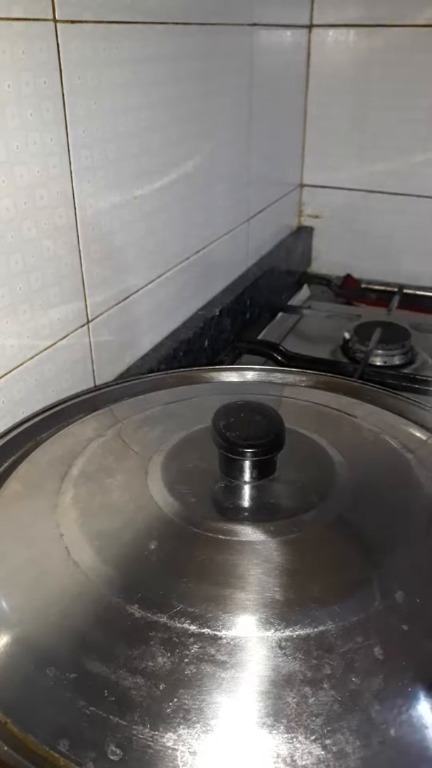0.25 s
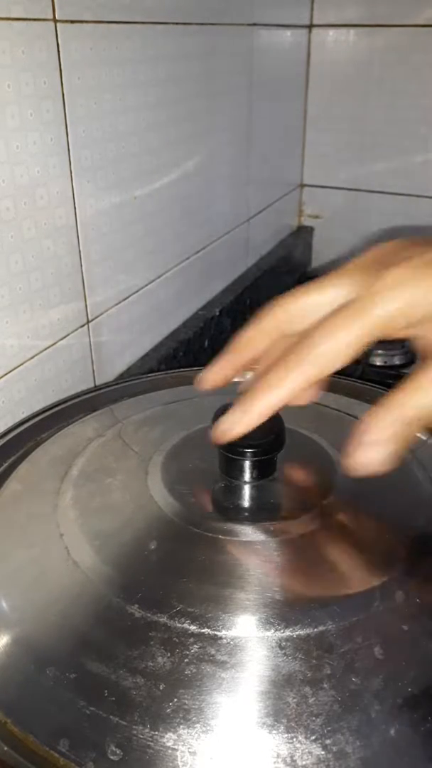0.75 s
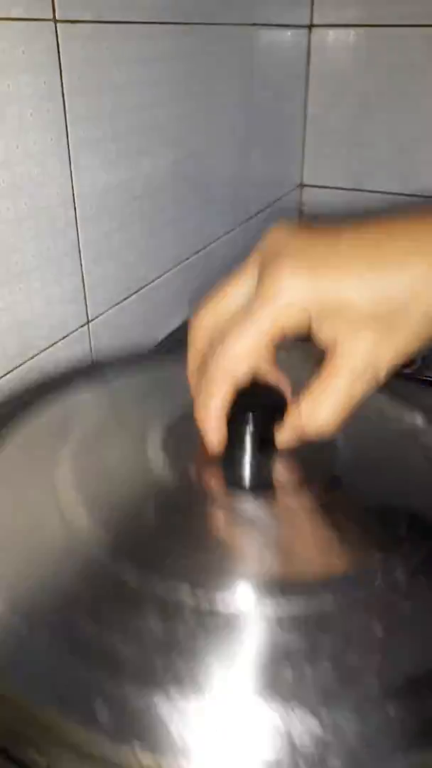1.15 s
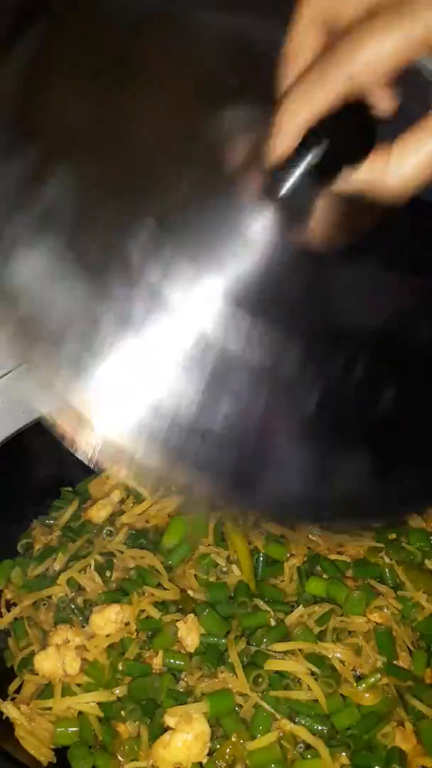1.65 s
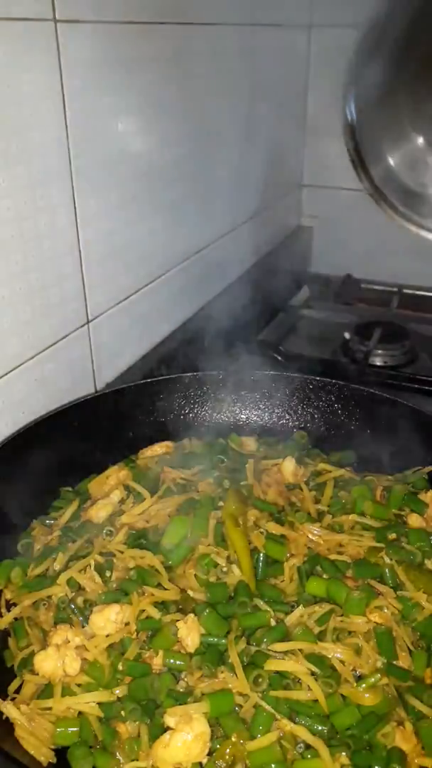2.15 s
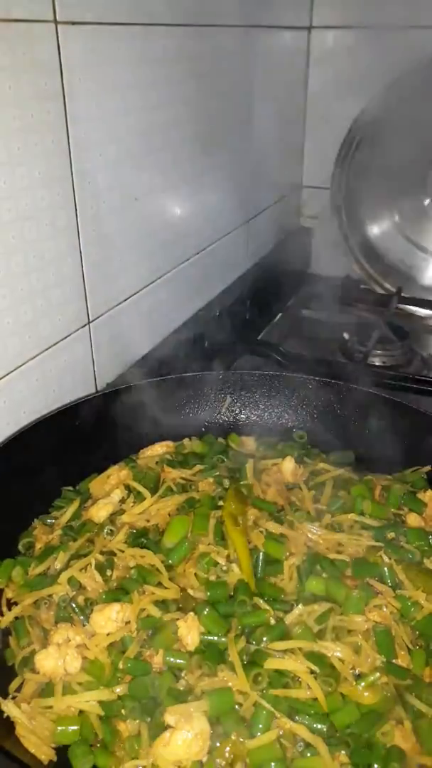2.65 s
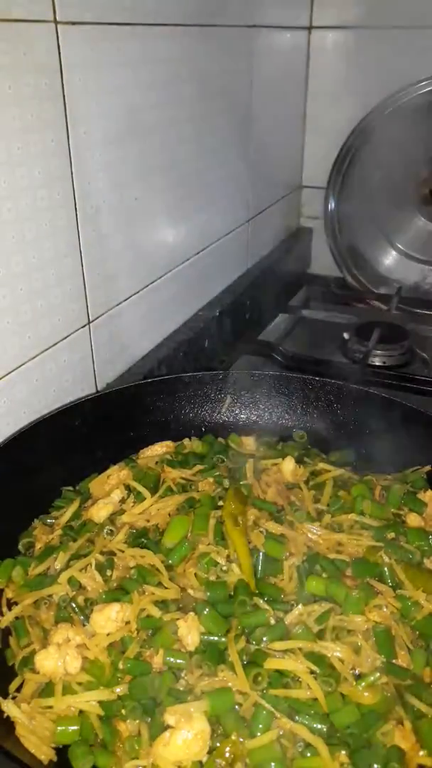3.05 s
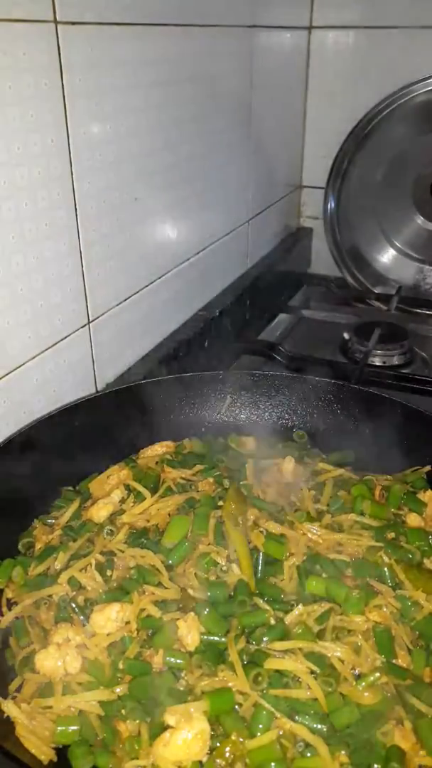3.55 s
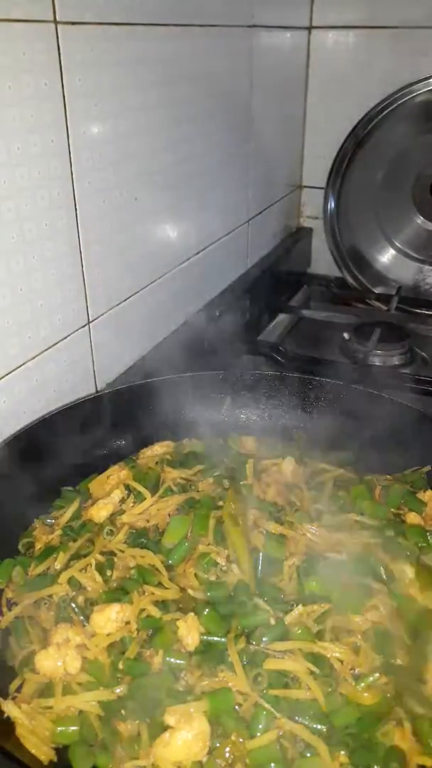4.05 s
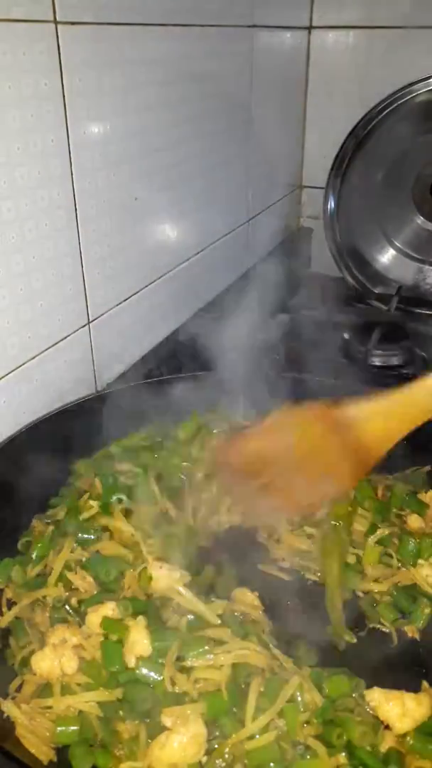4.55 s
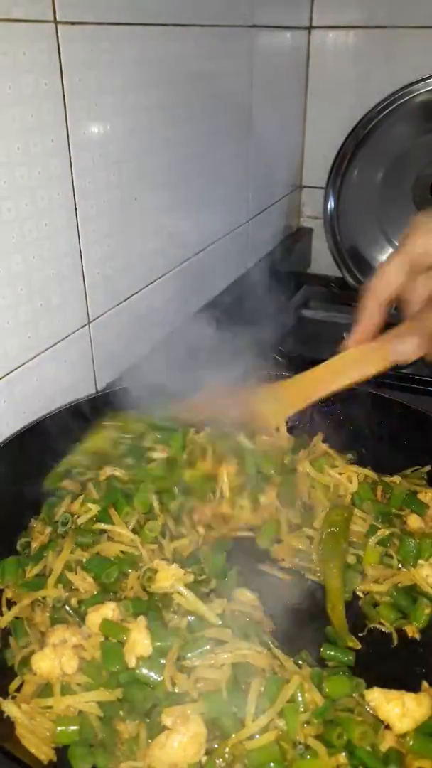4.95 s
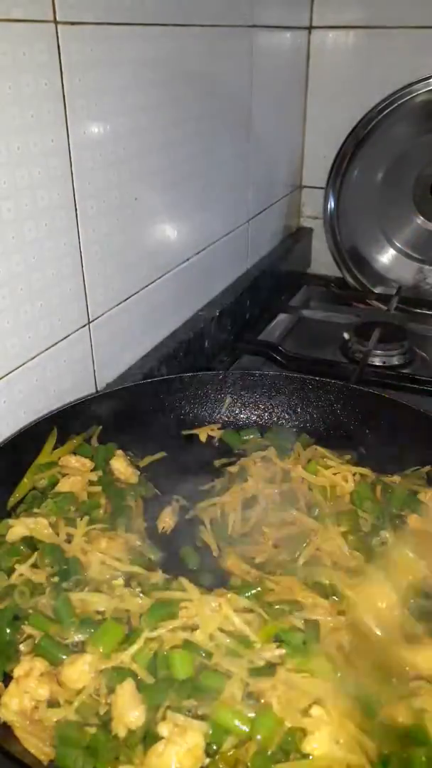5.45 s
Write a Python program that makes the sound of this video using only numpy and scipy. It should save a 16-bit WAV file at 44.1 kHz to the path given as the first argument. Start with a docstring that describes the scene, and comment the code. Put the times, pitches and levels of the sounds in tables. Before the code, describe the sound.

Muffled frying under a steel lid opens into bright crackling sizzle; the lid clanks and clatters down, then a wooden spatula scrapes through fiercer hiss.

```python
"""Vegetables and prawns sizzle and spit in a wok: random bursts and hiss, shaped in bands of pitch.
A steel lid muffles this until it is lifted off, knocked twice against the wall and clattered onto the hob.
A wooden spatula then scrapes and knocks the wok (bursts of noise through its ring) and the hiss swells.
A gas flame rumbles below as filtered noise, and steam whistles faintly under the lid for a moment.
Tiles echo the spits and utensils; the phone that listens turns itself down when the sound stays loud."""
import sys
import numpy as np
from scipy import signal
from scipy.fft import rfft, irfft
from scipy.io import wavfile
from scipy.ndimage import minimum_filter1d

SR = 44100
rng = np.random.default_rng(int(sys.argv[2]) if len(sys.argv) > 2 else 0)


def wav_record(signal):
    """Record a signal, one row per channel, as 16-bit PCM in the file named by sys.argv[1]."""
    frames = np.transpose(np.atleast_2d(signal))
    bounded = np.clip(frames, -1, 1)
    # unit amplitude maps onto the largest positive 16-bit level
    quanta = np.round(bounded * 32767).astype(np.int16)
    wavfile.write(sys.argv[1], SR, quanta)


N = 251803
T = np.arange(N) / SR  # time in seconds

# tone colour of the sizzle from the open wok, also used for hard cracks: [f/Hz, relative level/dB]
SIZZLE_COLOUR = [(500, -21.5), (1250, 2), (1750, -5.5), (2100, 0), (2850, -13), (3750, -6.5), (4100, 4.5),
                 (4620, -4.5), (5000, 0), (6400, -8), (8500, -5), (10900, -15.5), (13300, -9),
                 (15500, -8.5)]
# the lid starts to tilt, its gap is fully open, and its dome is carried clear of the wok
LID_TILT_S, LID_GAP_S, LID_CLEAR_S = 1.11, 1.29, 1.72


def undb(db):
    """Turn decibels into a factor."""
    return 10 ** (np.asarray(db) / 20)


def unit(x):
    """Scale a sound to an average (rms) strength of 1."""
    return x / np.sqrt(np.mean(x ** 2))


def curve(rows):
    """Join (time in s, value) points with straight lines."""
    return np.interp(T, *np.transpose(rows))


def ramp(start_s, end_s):
    """Go from 0 to 1 between two times."""
    return np.clip((T - start_s) / max(end_s - start_s, 1e-3), 0, 1)


def add(out, s, x):
    """Mix x into out from time s."""
    i = int(s * SR)
    out[i:i + len(x)] += x[:max(N - i, 0)]


def band(x, lo_hz, hi_hz, order=2):
    """Keep the pitches between two frequencies."""
    edges_hz = np.clip([lo_hz, hi_hz], 10, SR / 2 - 100)
    return signal.sosfilt(signal.butter(order, edges_hz, "band", fs=SR, output="sos"), x)


def through(x, response):
    """Let every sample of x set off the given response."""
    return signal.fftconvolve(x, response)[:len(x)]


def colour(x, points, size=4096):
    """Filter x to follow an outline of (Hz, dB) points, without sounding ahead of time."""
    hz, db = np.transpose(points)
    bins_hz = np.arange(size // 2 + 1) * SR / size
    gain = undb(np.interp(np.log(bins_hz + 1), np.log(hz), db))
    # folding the cepstrum gives the filter that answers soonest (minimum phase)
    cepstrum = irfft(np.log(gain))
    cepstrum[1:size // 2] *= 2
    cepstrum[size // 2 + 1:] = 0
    return through(x, irfft(np.exp(rfft(cepstrum))))


def fade(t60, length_s):
    """Die away by 60 dB in t60 seconds."""
    return np.exp(-np.log(1000) * T[:int(length_s * SR)] / t60)


def ring(modes):
    """One second of an object's ring after a tap; neighbouring modes swing in opposite directions."""
    out = np.zeros(SR)
    for k, (hz, db, t60) in enumerate(modes):
        tone = np.sin(2 * np.pi * hz * T[:SR])
        out += (-1) ** k * undb(db) * fade(t60, 1) * tone
    return out


def walk(rate):
    """Wander smoothly at random through about rate points a second, with spread 1."""
    return unit(np.interp(T * rate, np.arange(N), rng.standard_normal(N)))


def clicks(rate, spread_db):
    """Random clicks, about rate a second, many small and a few large."""
    size = undb(spread_db * np.minimum(rng.standard_normal(N), 2.4))  # no extreme giants
    happens = rng.random(N) < rate / SR
    return unit(happens * size * rng.choice([-1, 1], N))


def resting_db():
    """Level of the unstirred sizzle: a little leaks past the shut lid, the rest as the gap widens ever faster."""
    # how hard the resting food fries, heard with the wok open: [t/s, level/dB]
    vigour = [(0, -30.5), (.25, -28.5), (.6, -30.5), (1.75, -29), (2.05, -29.5), (2.42, -27), (2.95, -27),
              (3.8, -28.5), (5.71, -26.5)]
    shut_db = -15.5  # leak past the lid
    gap = ramp(LID_TILT_S, LID_GAP_S) ** 2
    return curve(vigour) + 20 * np.log10(gap + (1 - gap) * undb(shut_db))


def sizzle(rate=600, spread_db=7, hiss_db=-2, snap_db=-4, flutter_db=0.65, own_db=0.43, echo_db=-5, echo_s=0.0087):
    """Tiny steam bubbles burst in the oil at many pitches; stirring wets the hot metal and they merge to a hiss."""
    stir_start_s, stir_swell_s, stir_db = 3.916, 0.15, 3  # the swell stays up
    # treble lift, complete only in the top band: lid on, wok open, food stirred
    shut_top_db, open_top_db, stirred_top_db = 4, 4.5, 6.5
    shade_db = -6  # the dome shades the treble until it is carried clear
    gap = ramp(LID_TILT_S, LID_GAP_S)
    stirred = ramp(stir_start_s, stir_start_s + stir_swell_s)
    shaded = gap - ramp(LID_GAP_S, LID_CLEAR_S)
    lift_db = shut_top_db * (1 - gap) + open_top_db * (gap - stirred) + stirred_top_db * stirred
    lift_db = lift_db + shade_db * shaded
    # the sharpest bursts span all pitches
    snaps = undb(snap_db) * clicks(260, 7)
    # the level flutters, half as much once stirred
    flutter = (flutter_db * walk(45) + 0.9 * walk(20)) * (1 - 0.5 * stirred)
    keep = np.exp(-1 / (echo_s * SR))
    edges_hz = [400, 2800, 4600, 6500, 9000, 12000, 16500]
    out = np.zeros(N)
    for lo, hi in zip(edges_hz, edges_hz[1:]):
        height = np.clip((lo - 2800) / 8000, 0, 1)  # 0 in the low bands, 1 in the top band
        bubbles = clicks(rate, spread_db) + snaps
        hiss = undb(hiss_db - 2 * height + 3.5 * stirred)
        # every burst lingers as a diffuse echo between wok and tiles
        lingering = signal.lfilter([1 - keep], [1, -keep], bubbles ** 2 + 1e-12)
        echo = undb(echo_db) * np.sqrt(lingering)
        fizz = bubbles + np.hypot(hiss, echo) * rng.standard_normal(N)
        fizz = fizz / np.sqrt(1 + hiss ** 2)  # more hiss takes the place of bubbles
        out += band(fizz, lo, hi) * undb(flutter + own_db * walk(60) + height * lift_db)
    return unit(colour(out, SIZZLE_COLOUR)) * undb(resting_db() + stir_db * stirred)


def spits(gain_db=-2, swell_s=0.00023, noisy=0.64, count=100):
    """A droplet bursts with a ping of a few cycles and a puff of spray; a few big ones among many small."""
    # the biggest droplets that burst in the oil: [t/s, peak level before gain_db/dB, f/Hz]
    big = [(0.2846, -18, 13900), (1.1009, -23, 5700), (1.297, -21, 13400), (1.6995, -11, 8650),
           (1.7318, -11, 9250), (1.7512, -6, 6670), (1.7823, -8, 15400), (1.8555, -4, 13100),
           (2.162, -6, 14900), (2.389, -5, 5540), (2.5238, -4.5, 5450), (3.0096, -4, 6670),
           (3.1742, -10, 13500), (3.3822, -6, 8630), (3.424, -10.5, 6350), (4.8334, -2, 8800),
           (5.1088, -12, 12600), (5.406, 1, 8800)]
    # small ones: peak over the resting sizzle (before gain_db), random scatter, range of pitch
    over_db, scatter_db, low_hz, high_hz = 12.5, 2, 4580, 15400
    # water dripping from the lifted lid makes small ones fiercer for a while
    drip_db, drip_lasts_s = 0.5, 2.6
    dripping = ramp(LID_GAP_S, LID_CLEAR_S) - ramp(LID_CLEAR_S, LID_CLEAR_S + drip_lasts_s)
    usual_db = resting_db() + over_db + drip_db * dripping
    small = []
    for i in rng.integers(0, N, count):
        db = usual_db[i] + scatter_db * rng.standard_normal()
        small.append((T[i], db, low_hz * (high_hz / low_hz) ** rng.random()))
    out, t = np.zeros(N), T[:400]
    for s, db, hz in list(big) + small:
        spray = unit(band(rng.standard_normal(len(t)), 0.57 * hz, 13200))
        ping = t * np.exp(-t / swell_s) * (np.sin(2 * np.pi * hz * t) + noisy * spray)
        add(out, s, undb(db + gain_db) * ping / np.abs(ping).max())
    return out


def lid(contact_s=0.0018, roughness_db=1.1, roughness_rate=90):
    """Each blow restarts the lid's ring and adds to the hob's, with a short crash; their level wavers at random."""
    # ring of the steel lid: [f/Hz, relative level/dB, time to fall 60 dB/s]
    lid_modes = [(383, -17, 0.087), (523, -23, 0.15), (590, -22, 0.088), (756, -28, 0.47), (919, -17, .35),
                 (1044, -11, .33), (1078, -21, .15), (1135, -7, .21), (1290, -29, .3), (1373, -25, .25),
                 (1464, -19, .19), (1829, -28, .3), (1895, -26, .16), (1912, -29, 0.33), (2470, -36, 0.48),
                 (3680, -32, 0.42), (3930, -47, .2), (4320, -30, 0.15), (4450, -41, 0.23), (4680, -32, .15),
                 (5100, -40, 0.19), (5770, -28, 0.19)]
    # ring of the steel hob top and pan rests: [f/Hz, relative level/dB, time to fall 60 dB/s]
    hob_modes = [(183.5, -36, 0.51), (222.2, -29.5, 0.43), (285, -26, 0.14), (578, -32, 0.65),
                 (643, -15, 0.17), (772, -21, 0.16), (885, -23, .36), (924, -17, .64), (964, -22, .36),
                 (1098, -20, .2), (1141, -24, .48), (1224, -11.5, .17), (1260, -29, .58), (1324, -26, .42),
                 (1550, -26.5, 0.15), (2100, -45, 0.82), (2015, -32, 0.42), (2336, -39, 0.29),
                 (4090, -23, 0.084)]
    # crash of the dense, short-lived sheet-metal modes: [f/Hz, relative level/dB]
    crash_colour = [(50, -55), (120, -28), (230, -12), (400, -11), (720, -11), (1050, 2), (1400, -9.5),
                    (2000, -15), (2900, -36), (4150, -12.5), (6000, -23), (10000, -24.5), (15000, -57)]
    # two blows on the wall, then the clatter onto the hob:
    # [t/s, lid ring gain/dB, hob ring gain/dB, crash level/dB]
    clanks = [(2.7251, 2, -33, -12.5), (2.8228, -2.5, -9, -14), (2.9538, -5.5, 4.5, -9),
              (2.9825, -19, -0.5, -12), (2.9950, -22, 2, -26)]
    dome_lag_s = .0045  # the rim touches first and the dome rings a moment later
    # the hob top buzzes on after the crash; buzz_db is relative to the hob ring gain
    crash_t60_s, buzz_t60_s, buzz_db = 0.099, 0.79, -26
    out, lid_ring, hob_ring = np.zeros(N), ring(lid_modes), ring(hob_modes)
    onset = ramp(0, contact_s)[:SR]
    next_blow = [row[0] for row in clanks[1:]] + [T[-1]]
    for (s, lid_db, hob_db, crash_db), end in zip(clanks, next_blow):
        free_s = end - s - dome_lag_s  # the lid rings until shortly before it is restarted
        held = onset - ramp(free_s, free_s + contact_s)[:SR]
        add(out, s + dome_lag_s, undb(lid_db) * lid_ring * held)
        add(out, s, undb(hob_db) * hob_ring * onset)
        noise = rng.standard_normal(SR)
        crash = undb(crash_db) * fade(crash_t60_s, 1)
        buzz = undb(hob_db + buzz_db) * fade(buzz_t60_s, 1)
        dying = np.hypot(crash, buzz)
        add(out, s, colour(noise * dying, crash_colour) / np.std(colour(noise, crash_colour)))
    return out * undb(roughness_db * walk(roughness_rate))


def spatula(dull_db=-6, uneven_db=5.5, thump_lo_hz=540, thump_hi_hz=1900, rustle_db=-9):
    """Wood sticks and slips on the wok; a knock is a short, hard run of slips: wok ring, dull thump and crack."""
    # ring of the wok, damped by the food: [f/Hz, relative level/dB, time to fall 60 dB/s]
    wok_modes = [(570, -6, .035), (635, -1, .06), (745, -3, .035), (920, -7, .03), (1100, -4, .03),
                 (1250, -3, .035), (1410, -5, .035), (1750, -8, .02), (2100, -9, .02), (4150, -9, .015),
                 (5100, -8, .01)]
    # knocks on the wok, from the seated lid and later the spatula:
    # [t/s, wok ring level/dB, contact length/s, brightness f/Hz]
    knocks = [(0.281, -28, 0.009, 1500), (4.012, -33, 0.014, 1310), (4.261, -20, 0.0093, 690),
              (4.299, -28, 0.0065, 2200), (4.337, -29, 0.007, 800), (4.599, -28, 0.0043, 3600),
              (4.76, -26, 0.011, 3000), (5.057, -22.5, 0.0079, 3100), (5.6753, -10.5, 0.013, 860)]
    # pushes of the spatula through the food: [t of the hardest moment/s, scrape level there/dB]
    strokes = [(4.31, -27.5), (5.16, -29.5), (5.5, -46)]
    # each push builds up as the food piles against the blade, then lets go
    rise_db_per_s, fall_db_per_s = 45, 98
    # brighter contact cracks more: as loud as the ring at even_hz
    even_hz, crack_db_per_octave = 2280, 14
    wok = band(ring(wok_modes), 520, 9000, order=3)
    effort = np.zeros(N)
    for s, db in strokes:
        effort += undb(db - np.maximum(rise_db_per_s * (s - T), fall_db_per_s * (T - s)))
    slips = band(clicks(630, 8), 300, 3000, order=1)
    scrape = unit(through(slips, wok))
    rustle = unit(band(clicks(1500, 3.6), 1300, 2400))  # wet vegetables slide over each other
    out = (scrape + undb(rustle_db) * rustle) * effort * undb(uneven_db * walk(25))
    t = T[:SR // 4]
    for s, db, length_s, bright_hz in knocks:
        push = rng.standard_normal(SR // 4) * (t < length_s)
        soft = band(push, 120, max(bright_hz, 650))
        thump = band(soft, thump_lo_hz, thump_hi_hz, order=3)
        crack = colour(push * np.exp(-t / length_s), SIZZLE_COLOUR)
        crack_db = db + crack_db_per_octave * np.log2(bright_hz / even_hz)
        for part, part_db in (through(soft, wok), db), (thump, db + dull_db), (crack, crack_db):
            # set the energy by the level and the contact length
            add(out, s, undb(part_db) * part * np.sqrt(length_s * SR / np.sum(part ** 2)))
    return out


def whistle(hz=4200, width_hz=25):
    """Steam makes a thin, unsteady tone under the rim while the hand presses the knob: very narrow noise."""
    start_s, end_s, fade_s, level_db = .93, 1.18, .05, -55
    pressed = ramp(start_s, start_s + fade_s) - ramp(end_s - fade_s, end_s)
    jet = unit(band(rng.standard_normal(N), hz - width_hz / 2, hz + width_hz / 2))
    return jet * undb(level_db) * pressed


def burner(flame_db=-38, hollow_db=-33.0, flicker_db=0.75):
    """The gas flame rumbles and sounds the hollow of the wok, which changes as the lid comes off."""
    # rumble of the flame: [f/Hz, relative level/dB]
    flame_colour = [(25, -33), (42, -29), (62, -16), (108, -3), (135, -9.5), (180, 0), (250, -1.5),
                    (325, -13), (375, -10.5), (450, -15), (900, -20), (2500, -43)]
    # hollow tones of the flame under the wok:
    # [f/Hz, width/Hz, relative gain with lid on/dB, relative gain with lid off/dB]
    hollow_tones = [(627, 74.5, 1, 3.5), (731, 150, -8, -11.5), (843, 53, -1.5, -4), (1068, 137, 3, 2.5),
                    (1187, 64, 6, 3.5), (1291, 81, -6.5, -5.5), (1396, 320, -10, -10),
                    (2104, 276, -17, -13)]
    opened = ramp(LID_TILT_S, LID_CLEAR_S)
    rumble = unit(colour(rng.standard_normal(N), flame_colour)) * undb(1.14 * walk(12))
    hollow = np.zeros(N)
    for hz, width, on_db, off_db in hollow_tones:
        tone = band(rng.standard_normal(N), hz - width / 2, hz + width / 2)
        hollow += tone * undb(on_db + (off_db - on_db) * opened)
    return undb(flame_db) * rumble + undb(hollow_db + flicker_db * walk(25)) * unit(hollow)


def kitchen(x, wet_db, t60=.3):
    """Add dense reflections from tiles close by: a tail of dying noise that starts after 2 ms."""
    tail = rng.standard_normal(SR // 2) * fade(t60, .5) * (T[:SR // 2] > .002)
    return x + undb(wet_db) * through(x, tail / np.sqrt(np.sum(tail ** 2)))


def scene():
    """Mix frying, utensils and flame to one channel."""
    droplets = kitchen(spits(), wet_db=-5.0, t60=0.068)
    utensils = kitchen(lid() + spatula(), wet_db=-17, t60=.35)
    return (sizzle() + droplets + utensils + whistle() + burner())[None]


def gain_control(x, threshold_db=-19, depth_db=4.0, hold_s=0.84, attack_s=0.36):
    """Sustained loud sound turns the gain down a few decibels; it is held, then comes back."""
    # average power over roughly the last attack_s
    power = signal.lfilter([1], [1, -np.exp(-1 / (attack_s * SR))], x ** 2) / (attack_s * SR)
    cut_db = np.clip(10 * np.log10(power + 1e-12) - threshold_db, 0, depth_db)
    # hold the deepest cut of the last hold_s
    hold = int(hold_s * SR) // 2
    gain_db = minimum_filter1d(-cut_db, 2 * hold + 1, origin=hold, mode="nearest")
    ease = np.exp(-1 / (.1 * SR))  # glide over about 0.1 s
    return x * undb(signal.lfilter([1 - ease], [1, -ease], gain_db))


def record(dry):
    """The phone rides its gain, clips at full scale and cuts the top."""
    top_hz = 15680
    x = np.clip(gain_control(dry[0]), -1, 1)
    return signal.sosfilt(signal.ellip(10, .2, 80, top_hz, fs=SR, output="sos"), x)[None]


dry = scene()
out = record(dry)
wav_record(out)
```